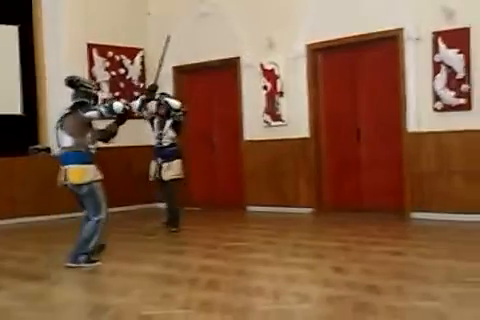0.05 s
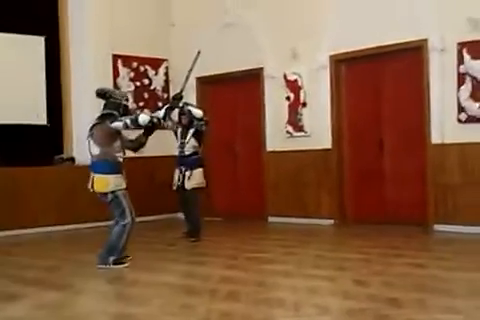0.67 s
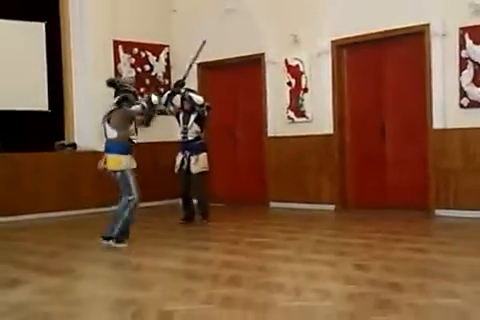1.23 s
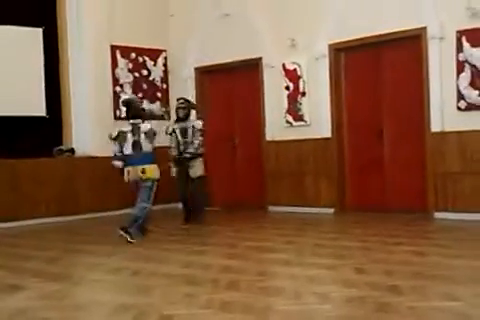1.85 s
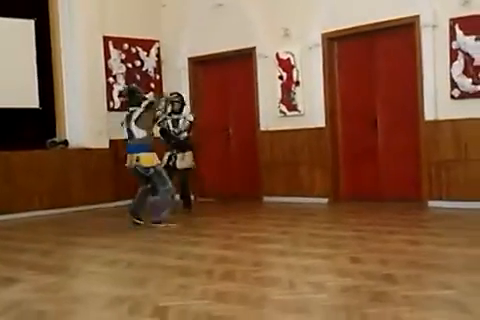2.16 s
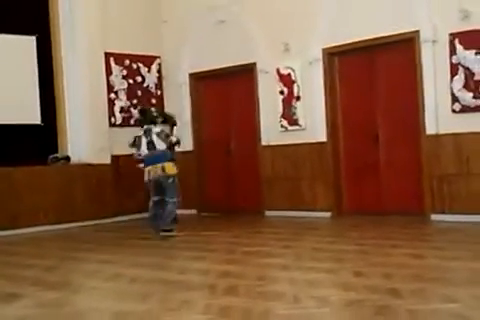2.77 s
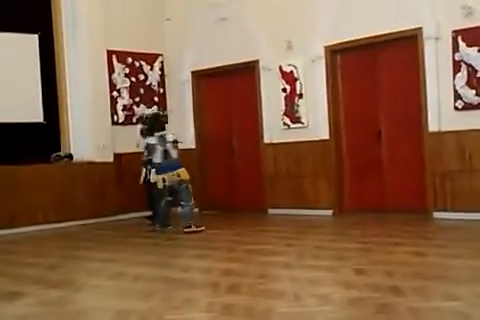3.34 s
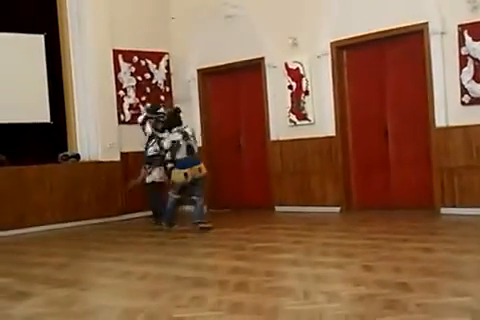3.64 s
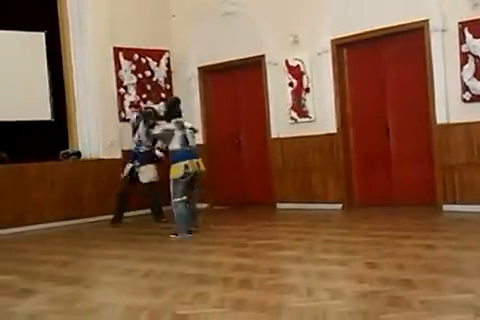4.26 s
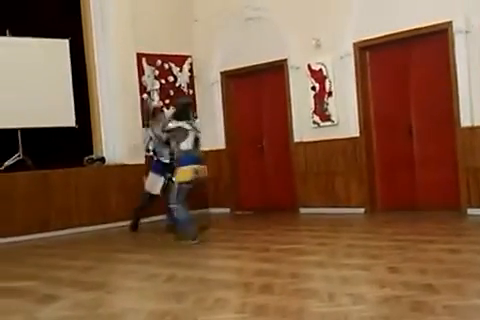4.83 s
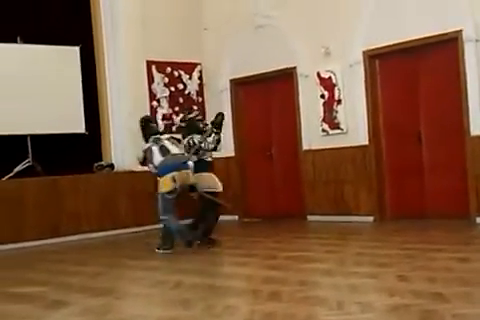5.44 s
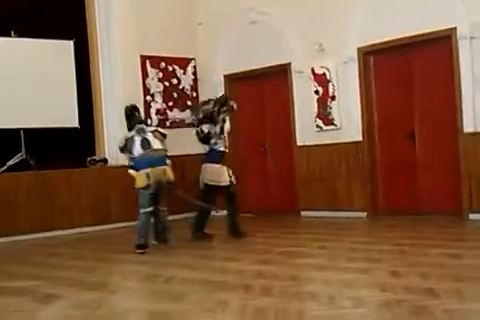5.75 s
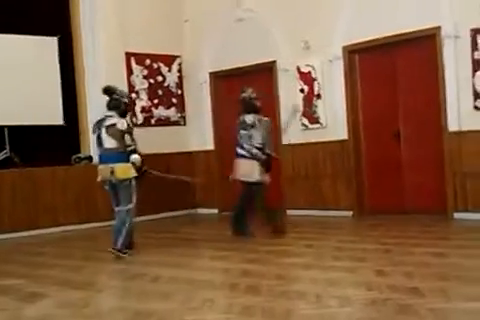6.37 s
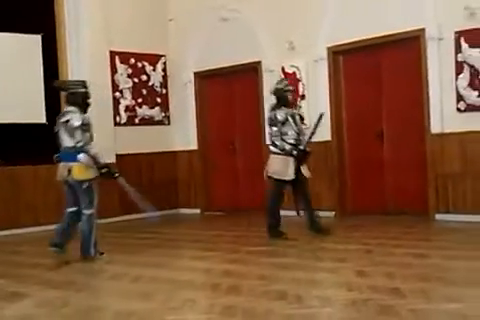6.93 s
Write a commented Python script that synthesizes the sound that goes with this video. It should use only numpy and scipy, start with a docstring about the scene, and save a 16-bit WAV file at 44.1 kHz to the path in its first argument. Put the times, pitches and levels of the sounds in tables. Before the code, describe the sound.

Two fencers trade quick, sharp blows with plastic swords that ring through an empty hall, then their soles slide and squeak.

```python
"""In the corner of a large empty hall, over room tone, shoes shuffle, thud and squeak on the parquet, toes
catching with a hissy tick as soles start to slide. From 1.8 s two armoured fencers trade eight blows with
plastic swords: each clack slaps back off the panelled corner, swells from the far wall and rings on for over a
second. Struck armour rattles, and the loudest blows overload a small microphone. After 5 s the bout winds down
into sliding, squeaking soles and a last light touch, while a faint hum sets in."""
import sys
import numpy as np
from scipy import signal
from scipy.fft import rfft, irfft
from scipy.io import wavfile
from scipy.ndimage import uniform_filter1d

SR = 44100
rng = np.random.default_rng(int(sys.argv[2]) if len(sys.argv) > 2 else 0)


def master_out(mix):
    """Clip the mix to full scale and print it as 16-bit PCM to the path in sys.argv[1]."""
    frames = np.transpose(np.atleast_2d(mix))
    ceiling = np.clip(frames, -1, 1)
    pcm = np.round(ceiling * 32767).astype(np.int16)
    wavfile.write(sys.argv[1], SR, pcm)


N = 312840
TIME = np.arange(N) / SR
TAIL_TIME = np.arange(110250) / SR  # 2.5 s for one hit to ring out

# colour of the room tone and microphone hiss: frequency_hz, relative_db
ROOM_TONE_EQ = [(25, 4), (45, -2), (70, -8), (115, -7), (148, 4), (190, -7), (480, -4), (700, -17.5),
                (2000, -12.5), (4300, -15), (5500, -13), (7000, -21), (10000, -27), (15500, -29)]
# reverb time of the hall: frequency_hz, t60_s
HALL_DECAY = [(60, 2.35), (250, 1.03), (700, 1.586), (1800, 1.69), (3800, 1.6), (6000, 1.31), (12000, 0.09)]
# soles sliding over the parquet: start_s, length_s, hiss_db, scuff_db
SOLE_SLIDES = [ (0.138, 0.078, -57, -63), (0.476, 0.11, -50, -72), (1.225, 0.19, -48.5, -59),
               (1.366, 0.42, -45.5, -50), (1.526, 0.11, -58, -46.5), (5.554, 0.39, -44.5, -49),
               (6.163, 0.43, -50, -57.5), (6.657, 0.29, -51, -53.5), ]
# heels landing: start_s, level_db, pitch_hz
HEEL_DROPS = [(.189, -52, 261), (1.17, -45, 200), (1.386, -45, 168), (1.551, -41, 258), (4.007, -16, 208),
              (4.189, -55, 133), (6.50, -40.5, 258)]
# soles squeaking: start_s, length_s, start_pitch_hz, end_pitch_hz, level_db
SOLE_SQUEAKS = [(0.396, .14, 1374, 1206, -50), (5.46, 0.26, 3890, 3790, -39),
                (5.758, 0.215, 920, 863, -49.5), (5.965, 0.1023, 3460, 3320, -45.5),
                (6.706, 0.18, 815, 835, -54)]
# toes catching as soles start to slide, light touches, and the last blow's slap off the corner: start_s,
# level_db, pitch_hz, width_hz, decay_s
SHARP_TICKS = [ (0.493, -45, 4040, 1300, 0.015), (1.38, -38.5, 3840, 1147, 0.018),
               (3.493, -25, 1890, 3000, 0.0009), (3.978, -8.5, 3700, 1700, 0.0046),
               (5.017, -13.5, 1400, 2000, 0.0018), (5.034, -15.5, 1390, 1800, 0.0043),
               (6.643, -29, 1870, 795, 0.0013), (6.654, -41, 4270, 1110, 0.029), ]
# sword blows: start_s, level_db, crack_db, corner_lag_s, slap_db, echo_db, padding_db,
# brightness_db, ring_hz, thump_db, thump_hz
SWORD_BLOWS = [ (1.7995, -5.5, 6, 0.02, 4, 3, -4, -1, 4000, -18.5, 284),
               (2.251, -14, -14, 0.017, 6, 3, 2, -3.5, 3600, -20, 327),
               (2.687, -8.5, 3.5, 0.016, -6, 7.5, -0.5, 1, 3900, -15.5, 299),
               (3.119, -20.5, -15, 0.027, -6, 1, 7.5, 1, 3920, -22, 243),
               (3.4855, -11.5, 1.5, 0.015, -4, 7.5, -4, -2, 3700, -17, 287),
               (3.9576, -18, 3.5, .0152, 13, 3, 8.5, -3.5, 4100, -13.5, 167),
               (4.4070, -7.5, -5, 0.016, 6.5, 5.5, -2.5, -4, 3850, -15, 342),
               (4.9970, -13, 5, 0.015, 1, -8.5, 6, -2, 5100, -16.5, 228), ]
# colour of plastic on plastic: frequency_hz, relative_db
CLACK_EQ = [(30, -25), (90, -13.5), (170, -10.5), (300, -2), (560, -1.5), (850, 0), (1250, 1.5),
            (1800, 1.5), (2700, -0.5), (4400, -0.5), (5200, -9), (6500, -20), (10000, -30), (15000, -35)]
# resonances of the blades: pitch_hz, width_hz, gain_db
BLADE_MODES = [(315, 48, -7.5), (1130, 50, -11.5), (1520, 56, -37), (3300, 300, -12), (4840, 92, -17)]
# metal fittings shaken when armour is struck: start_s, level_db, decay_s
ARMOUR_RATTLES = [(3.128, -40.5, 0.043), (3.954, -38, 0.088), (4.994, -40.5, 0.057), (5.155, -39, 0.016)]
# resonances of the fittings: pitch_hz, relative_db
FITTING_MODES = [(5480, 14), (6067, 12), (6350, 4), (6724, 9), (7250, 3), (7555, 4), (8133, -6),
                 (9030, -13), (10146, 2), (11158, -1)]


def undb(db):
    """Decibels to gain."""
    return 10 ** (np.asarray(db) / 20)


def unit(x):
    """Scale to rms 1."""
    return x / np.sqrt(np.mean(x ** 2))


def add(out, start_s, x):
    """Mix x into out from start_s."""
    i = max(int(start_s * SR), 0)
    out[i:i + len(x)] += x[:N - i]


def at_hz(points, hz):
    """Read a curve of (frequency_hz, value) points on a log-frequency axis."""
    point_hz, value = np.transpose(points)
    return np.interp(np.log(hz + 1), np.log(point_hz), value)


def resonance(x, hz, width_hz):
    """Two-pole band-pass, gain 1 at the centre."""
    return signal.lfilter(*signal.iirpeak(hz, hz / width_hz, fs=SR), x)


def band_noise(count, hz, width_hz):
    """A band of noise, rms 1."""
    low_hz = np.hypot(hz, width_hz / 2) - width_hz / 2
    high_hz = min(low_hz + width_hz, .45 * SR)
    band = signal.butter(2, [low_hz, high_hz], "bandpass", fs=SR, output="sos")
    return unit(signal.sosfilt(band, rng.standard_normal(count)))


def wobble(count, smooth_samples):
    """A smoothed random modulator, rms 1."""
    return unit(uniform_filter1d(rng.standard_normal(count), size=smooth_samples))


def impulse_from_eq(eq_db):
    """The tightest (minimum-phase) impulse with this spectrum."""
    cepstrum = irfft(eq_db * np.log(10) / 20)
    half = len(cepstrum) // 2
    cepstrum[1:half] *= 2
    cepstrum[half + 1:] = 0
    return irfft(np.exp(rfft(cepstrum)))


def held(start_s, length_s, attack_s, release_s):
    """An envelope that rises, holds and dies away."""
    age = TIME - start_s
    return np.clip(age / attack_s, 0, 1) * np.exp(-np.maximum(age - length_s, 0) / release_s)


def burst(start_s, decay_s):
    """An envelope with an instant attack and a half-bell decay."""
    age = TAIL_TIME - start_s
    return (age >= 0) * np.exp(-(age / decay_s) ** 2 / 2)


def room_tone(hiss_db=-53, hum_db=-58, hum_hz=121, hum_start_s=5.7, hum_rise_s=.16, waver=0.38):
    """A steady bed of hiss; a faint, wavering hum fades in as the bout ends."""
    hz = np.linspace(0, SR / 2, N // 2 + 1)
    hiss = unit(irfft(rfft(rng.standard_normal(N)) * undb(at_hz(ROOM_TONE_EQ, hz)), N))
    hum = np.sqrt(2) * np.sin(2 * np.pi * hum_hz * TIME) + waver * band_noise(N, hum_hz, width_hz=7)
    fade_in = np.clip((TIME - hum_start_s) / hum_rise_s, 0, 1)
    return undb(hiss_db) * hiss + undb(hum_db) * fade_in * hum


def shuffle(rustle_hiss_db=-55, rustle_scuff_db=-60, flicker_db=2.0):
    """Cloth rustles throughout and soles slide: a flickering hiss over a duller scuff."""
    hiss_power, scuff_power = undb(rustle_hiss_db) ** 2, undb(rustle_scuff_db) ** 2
    for start_s, length_s, hiss_db, scuff_db in SOLE_SLIDES:
        slide = held(start_s, length_s, attack_s=0.032, release_s=0.081)
        hiss_power += (undb(hiss_db) * slide) ** 2
        scuff_power += (undb(scuff_db) * slide) ** 2
    hiss = band_noise(N, hz=3880, width_hz=1250) + undb(-3.0) * band_noise(N, hz=2130, width_hz=1970)
    scuff = band_noise(N, hz=577, width_hz=1180)
    flicker = undb(flicker_db * wobble(N, smooth_samples=900))
    rubbing = np.sqrt(hiss_power) * unit(hiss) + np.sqrt(scuff_power) * scuff
    return in_hall(flicker * rubbing, wet_db=-6.0)


def hall_tail(build_s=0.022, far_wall_s=.088, far_wall_db=1.5, air_db=-14, air_hz=9500):
    """Diffuse reflections build, swell as the far wall answers and lose their top end to the air."""
    hz, _, noise = signal.stft(rng.standard_normal(len(TAIL_TIME)), SR, nperseg=256)
    age = np.linspace(0, TAIL_TIME[-1], noise.shape[1])
    air = undb(air_db * hz ** 6 / (hz ** 6 + air_hz ** 6))
    decay = np.exp(-np.log(1000) * age / at_hz(HALL_DECAY, hz)[:, None])
    wash = signal.istft(noise * air[:, None] * decay, SR)[1][:len(TAIL_TIME)]
    build = np.sqrt(1 - np.exp(-TAIL_TIME / build_s))
    swell = undb(far_wall_db * burst(far_wall_s, decay_s=0.055))
    return wash * build * swell


def in_hall(x, wet_db):
    """A dry sound plus the hall's reverb."""
    tail = hall_tail()
    return x + undb(wet_db) * signal.fftconvolve(x, tail / np.linalg.norm(tail))[:N]


def thumps(decay_s=0.0076, grit_db=-7, low_cut_hz=110):
    """Each heel and blow is a soft, heavy push that swings floor or padding for a few cycles."""
    out = np.zeros(N)
    body_hits = [(start_s, thump_db, thump_hz) for start_s, *_, thump_db, thump_hz in SWORD_BLOWS]
    for start_s, level_db, pitch_hz in HEEL_DROPS + body_hits:
        swing = np.sqrt(2) * np.sin(2 * np.pi * pitch_hz * TAIL_TIME)
        grit = undb(grit_db) * band_noise(len(TAIL_TIME), pitch_hz, width_hz=pitch_hz)
        add(out, start_s, undb(level_db) * np.exp(-TAIL_TIME / decay_s) * (swing + grit))
    # a small patch of floor or padding radiates little deep bass
    low_cut = signal.butter(2, low_cut_hz, "highpass", fs=SR, output="sos")
    return in_hall(signal.sosfilt(low_cut, out), wet_db=-4.0)


def squeaks(jitter=0.04, rasp_db=-7, rasp_width_hz=160):
    """Rubber sticks and slips: a gliding tone with a shaky pitch and a raspy grip."""
    out = np.zeros(N)
    for start_s, length_s, start_hz, end_hz, level_db in SOLE_SQUEAKS:
        count = int(length_s * SR)
        slip = jitter * wobble(count, smooth_samples=70) * np.sqrt(1000 / start_hz)
        pitch_hz = np.linspace(start_hz, end_hz, count) * (1 + slip)
        tone = np.sin(2 * np.pi * np.cumsum(pitch_hz) / SR)
        grip = unit(1 + undb(rasp_db) * band_noise(count, rasp_width_hz / 2, rasp_width_hz))
        add(out, start_s, undb(level_db) * np.sqrt(np.hanning(count)) * grip * tone)
    return in_hall(out, wet_db=-3.5)


def tick(pitch_hz, width_hz, decay_s, snap_db=-20):
    """A bright snap on top of one briefly ringing band."""
    ring = band_noise(len(TAIL_TIME), pitch_hz, width_hz)
    snap = undb(snap_db) * band_noise(len(TAIL_TIME), hz=6900, width_hz=6000)
    return burst(0, decay_s) * (ring + snap)


def ticks():
    """Short sharp ticks: toes catching as soles start to slide, light touches, and the last blow's slap back
    off the corner."""
    out = np.zeros(N)
    for start_s, level_db, pitch_hz, width_hz, decay_s in SHARP_TICKS:
        add(out, start_s, undb(level_db) * tick(pitch_hz, width_hz, decay_s))
    return in_hall(out, wet_db=-3.5)


def clack(padding_db, bright_db, ring_hz, thud_hz=190, knock_hz=1500, bright_hz=3200, trim_db=-0.45):
    """Plastic hits plastic: padding trades hollow knock for thud; each blow has its own brightness."""
    hz = np.linspace(0, SR / 2, 2049)
    base_eq = at_hz(CLACK_EQ, hz)
    thud = padding_db * np.exp(-(np.log2((hz + 1) / thud_hz) / 3.0) ** 2)
    knock_db = -1.37 - 0.43 * padding_db
    knock = knock_db * np.exp(-(np.log2((hz + 1) / knock_hz) / 1.24) ** 2)
    shelf = bright_db * hz ** 2 / (hz ** 2 + bright_hz ** 2)
    hit = impulse_from_eq(base_eq + thud + knock + shelf) / np.linalg.norm(impulse_from_eq(base_eq))
    modes = list(BLADE_MODES) + [(ring_hz, 180, -3)]  # one ring depends on where the blade is hit
    ring = sum(undb(db) * resonance(hit, pitch_hz, width_hz) for pitch_hz, width_hz, db in modes)
    return undb(trim_db) * (hit + ring)


def swords(crack_s=0.002, echo_delay_s=0.0008, echo_decay_s=0.018, clump_db=1.8, clump_decay_s=0.32):
    """Each clack lands as a direct crack, a tight bunch of corner echoes, then the hall's tail."""
    out = np.zeros(N)
    for start_s, level_db, crack_db, lag_s, _, echo_db, padding_db, bright_db, ring_hz, *_ in SWORD_BLOWS:
        crack = undb(crack_db) * burst(0, crack_s)
        echoes = undb(echo_db) * burst(lag_s + echo_delay_s, echo_decay_s)
        paths = (crack + echoes) * rng.standard_normal(len(TAIL_TIME)) + hall_tail()
        # early reflections come in clumps that even out as they multiply
        clumps = np.tanh(wobble(len(TAIL_TIME), smooth_samples=130))
        paths *= undb(clump_db * clumps * np.exp(-TAIL_TIME / clump_decay_s))
        blow = signal.fftconvolve(paths, clack(padding_db, bright_db, ring_hz))
        add(out, start_s, undb(level_db) * blow)
    return out


def panel_slaps():
    """The panelling throws each blade's ring back as one sharp slap."""
    out = np.zeros(N)
    for start_s, level_db, _, lag_s, slap_db, *_, ring_hz, _, _ in SWORD_BLOWS:
        slap = tick(ring_hz, width_hz=930, decay_s=.0014)
        add(out, start_s + lag_s, undb(level_db + slap_db) * slap)
    return out


def rattles(contacts_per_s=450, ring_width_hz=80, scrape_db=-4):
    """Buckles and plates chatter: a shower of tiny contacts, each ringing the same thin metal."""
    shaking = np.zeros(N)
    for start_s, level_db, decay_s in ARMOUR_RATTLES:
        add(shaking, start_s, undb(level_db) * burst(0, decay_s))
    clicks = (rng.random(N) < contacts_per_s / SR) * np.sign(rng.standard_normal(N))
    contacts = unit(clicks) * shaking
    ring = sum(undb(db) * resonance(contacts, hz, ring_width_hz) for hz, db in FITTING_MODES)
    scrape = shaking * band_noise(N, hz=9000, width_hz=4500)
    return in_hall(unit(ring) * np.std(contacts) + undb(scrape_db) * scrape, wet_db=0.5)


def scene():
    """The mono mix: room tone, footwork and swordplay."""
    mix = room_tone() + shuffle() + thumps() + squeaks() + ticks() + swords() + panel_slaps() + rattles()
    return mix[None]


def record(dry, knee_power=16, high_cut_hz=15800):
    """The microphone's input stage clips the loudest peaks with a tight knee; the top end is cut."""
    clipped = dry / (1 + dry ** knee_power) ** (1 / knee_power)
    high_cut = signal.ellip(8, .2, 70, high_cut_hz, fs=SR, output="sos")
    return signal.sosfilt(high_cut, clipped)


dry = scene()
out = record(dry)
master_out(out)
```